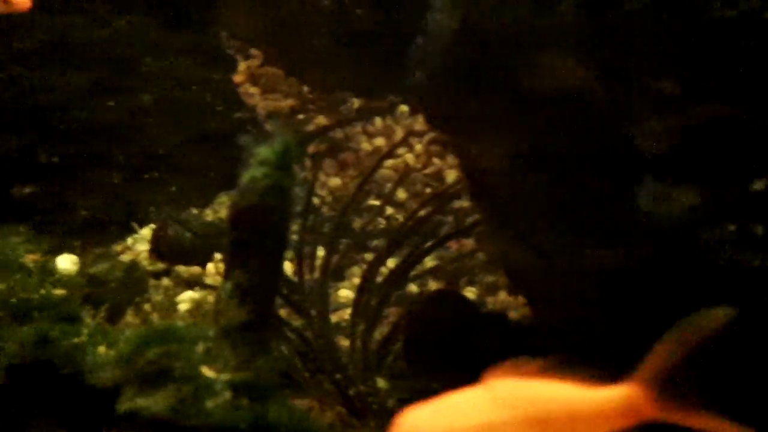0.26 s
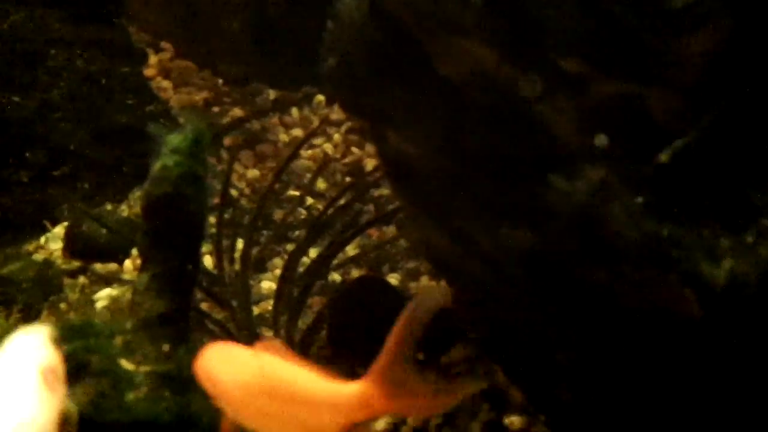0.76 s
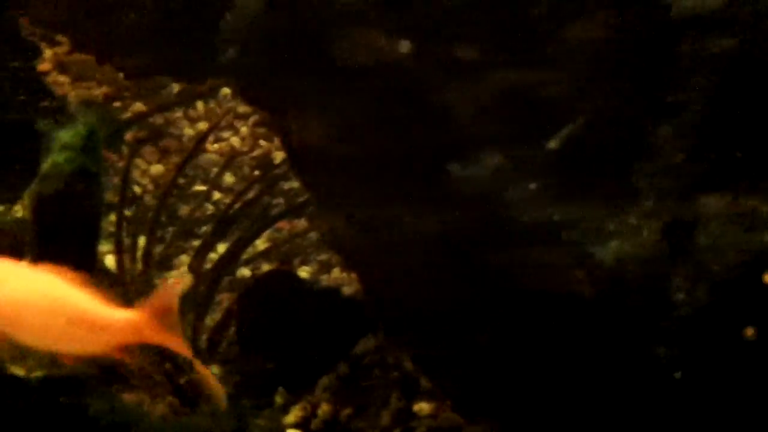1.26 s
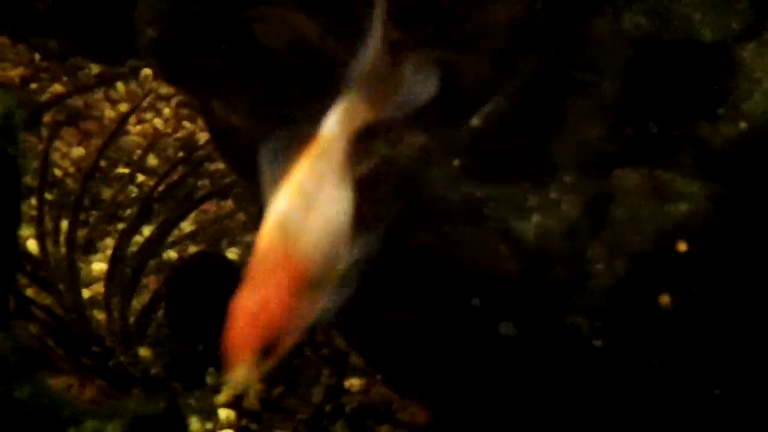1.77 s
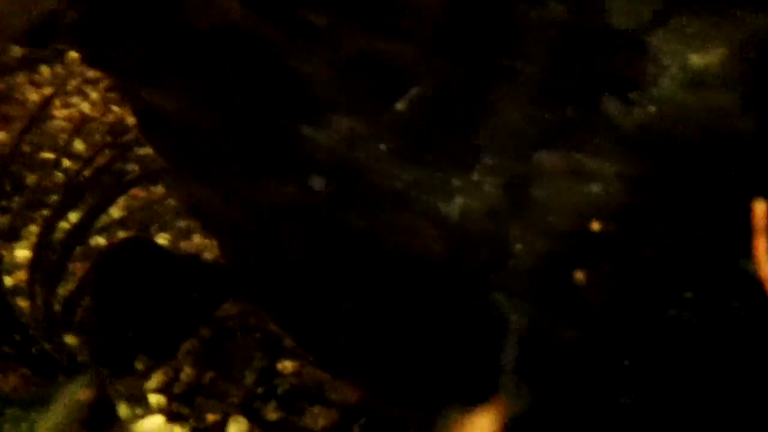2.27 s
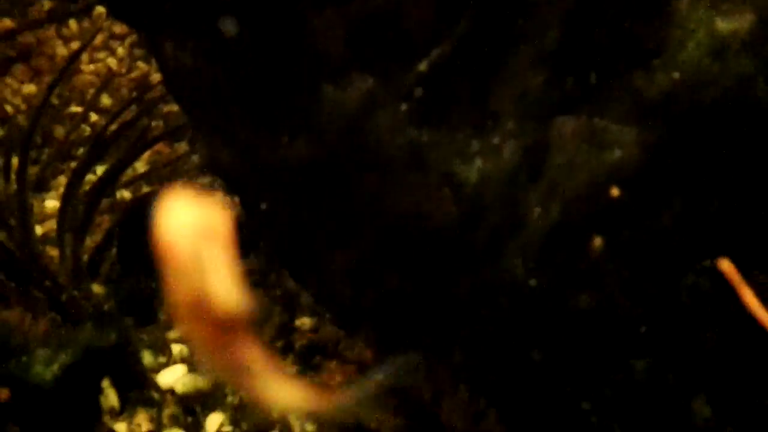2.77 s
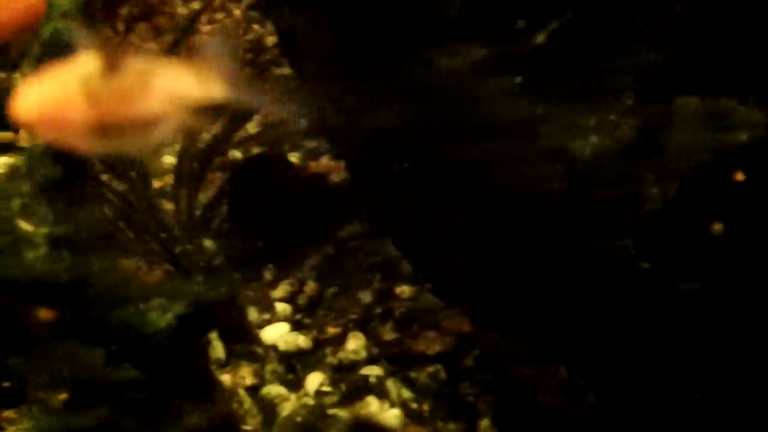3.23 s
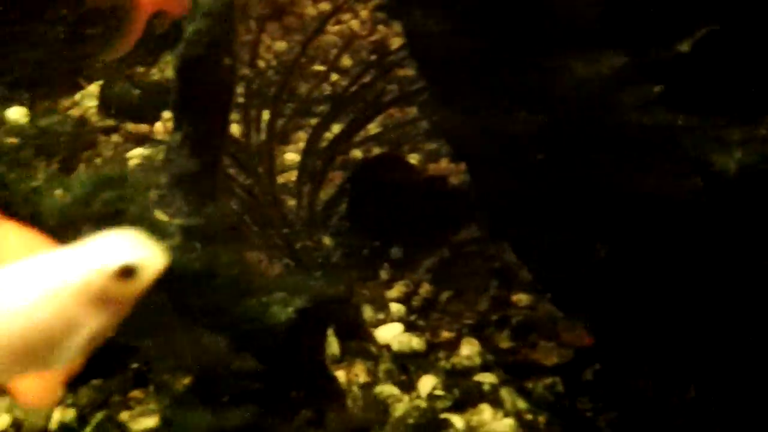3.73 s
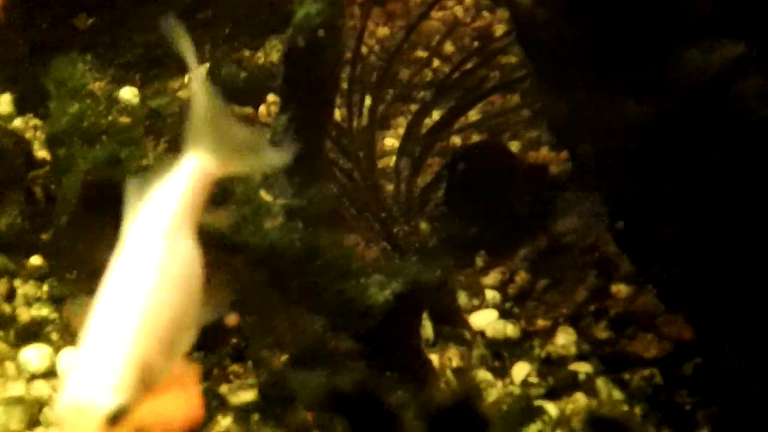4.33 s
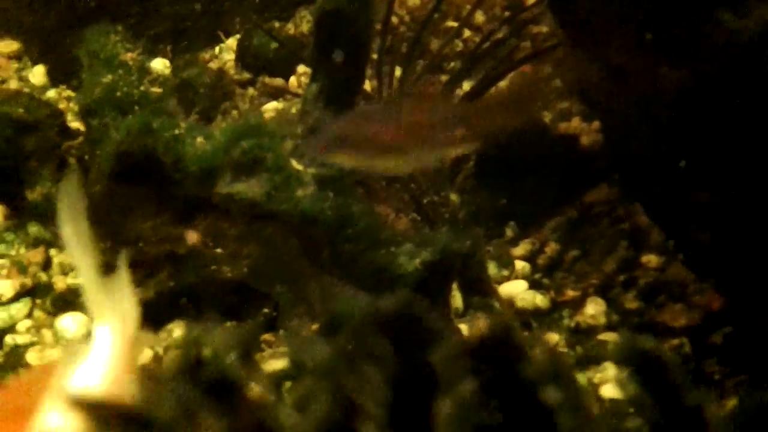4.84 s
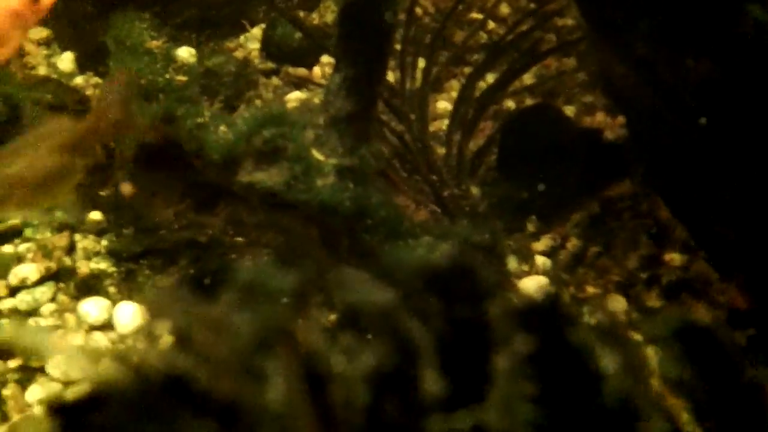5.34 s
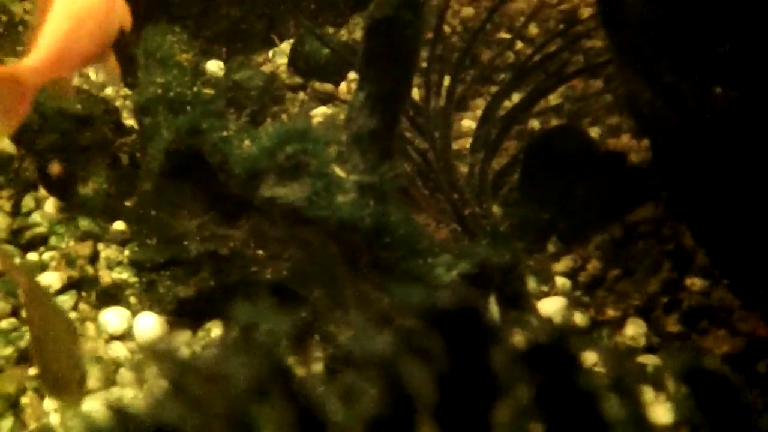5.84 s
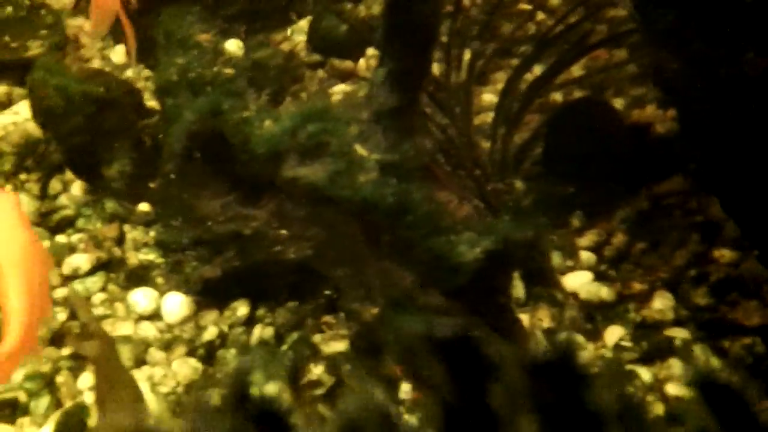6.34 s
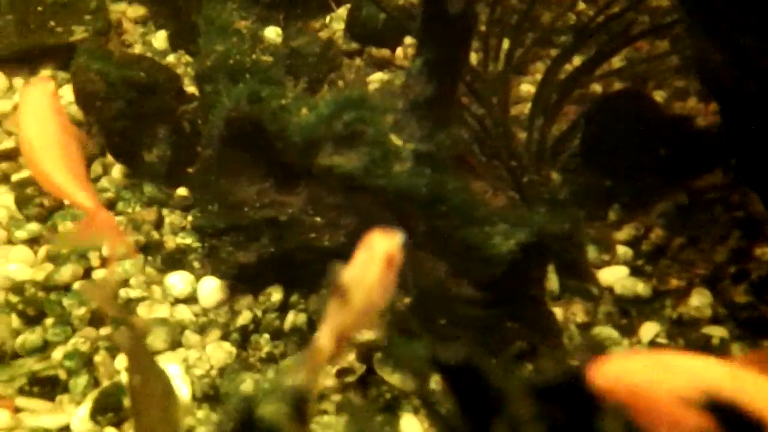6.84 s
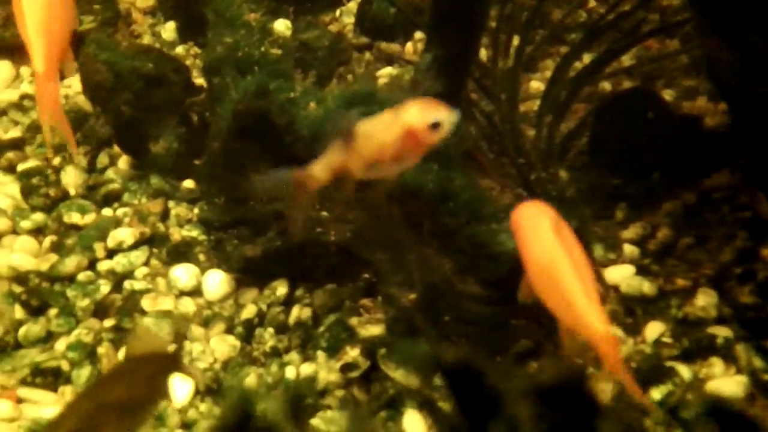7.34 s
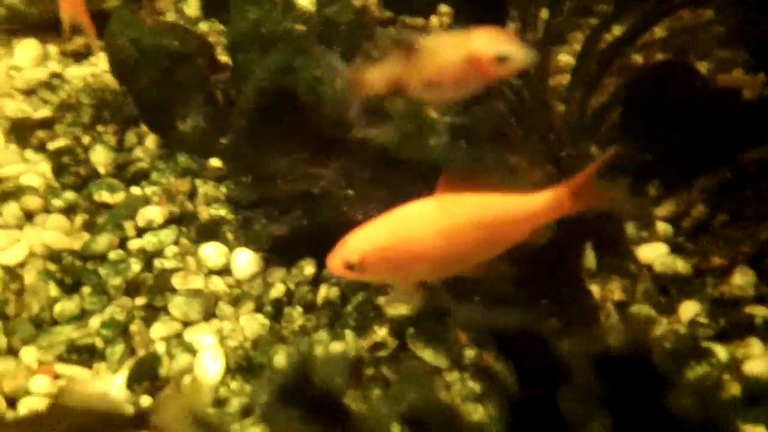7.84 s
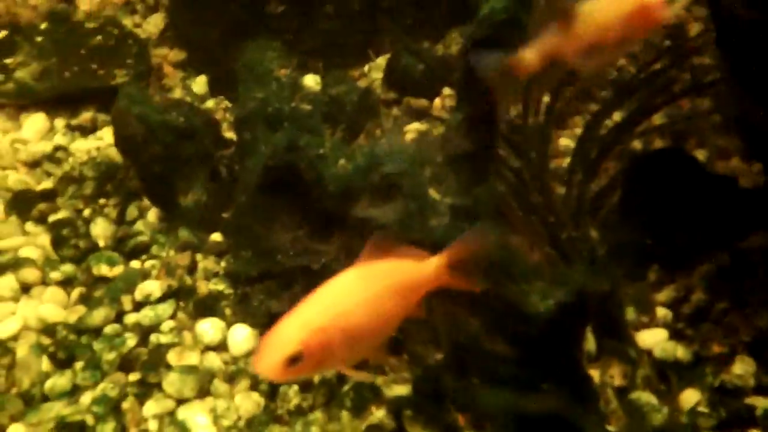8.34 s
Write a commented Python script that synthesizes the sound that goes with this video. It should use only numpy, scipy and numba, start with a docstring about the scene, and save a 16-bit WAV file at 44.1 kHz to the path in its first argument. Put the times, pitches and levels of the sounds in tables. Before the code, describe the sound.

Low electrical hum and churning water from a fish tank, with handling rumble and a run of loud microphone bumps in the second half.

```python
"""From the start an aquarium pump hums on the mains and its water rushes through the tank's hollow
resonances; a hand-held camera close by rumbles and rocks in the hand, over faint hiss.
From 5 s, knocks on the camera body overload the microphone. After each hard one the stepped gain
control shuts the hum out for a moment, then ticks back up. A last light knock and thump come at 8.1 s."""
import sys
import numpy as np
from scipy import signal
from scipy.fft import rfft, irfft, next_fast_len
from scipy.io import wavfile
from scipy.ndimage import minimum_filter1d
from numba import njit

SR = 44100
rng = np.random.default_rng(int(sys.argv[2]) if len(sys.argv) > 2 else 0)


def generate_wav(signal):
    """Clip the signal to [-1, 1] and save it as 16-bit WAV at the path in sys.argv[1]."""
    frames = np.transpose(np.atleast_2d(signal))
    scaled = np.clip(frames, -1, 1) * 32767
    pcm = np.round(scaled).astype(np.int16)
    wavfile.write(sys.argv[1], SR, pcm)


N = 379260
TIME_S = np.arange(N) / SR

# Knocks on the camera, before gain control: (time [s], peak [dB], contact [ms], sway peak [dB])
CAMERA_KNOCKS = [(4.9546, 25.5, 0.72, -3.5), (5.5384, 4.5, 0.46, -15.5), (5.7452, 25, 0.53, -8),
                 (5.9841, 19, 0.72, -0.5), (6.3052, 24, .53, 3.5), (6.4044, 8, 1.6, -13),
                 (6.4861, 4, 1.4, -3.5), (6.7001, 26, .58, -1), (6.9037, 17, .61, -4.5),
                 (6.9736, 11.5, 2.06, -12.5), (7.1545, 18, 0.5, -1), (7.2592, 10, 1.54, -3),
                 (8.1136, 1, 0.19, 8.5)]


def pump(mains_hz=49.905):
    """The magnet pulls twice per mains cycle, so even multiples lead."""
    # Hum partials: (mains multiple, rms [dB])
    partials = [(1, -44.5), (2, -22.5), (3, -34), (4, -39.5), (5, -35.5), (6, -35.5), (8, -35), (9, -38.5),
                (10, -32.5), (11, -60.5), (14, -63.5)]
    return sum(tone(round(k) * mains_hz, db) for k, db in partials)


def water(low_offset_db=0.33, low_follow=0.17):
    """One uneven flow stirs the tank's high resonances and, less keenly, its low ones."""
    # Hollow tank resonances: (centre [Hz], width [Hz], base density [dB])
    tank_modes = [(64.7, 36, -47.5), (148.9, 18, -47.5), (194, 36, -49), (252.4, 28, -48.5), (292, 36, -44),
                  (384.5, 62, -51), (442.2, 54, -46.5), (493.4, 56, -49), (561.3, 63, -60)]
    # Moving-water resonances: (centre [Hz], width [Hz], base density [dB])
    water_modes = [(661, 98, -69), (796, 93, -68), (944, 55, -75), (1154, 260, -85), (3260, 100, -99)]
    # Flow strength: (time [s], gain [dB])
    flow = [(0, 3.5), (.3, 5.5), (.8, 2), (2.5, -1.5), (3.3, 5.5), (4.3, 5.5), (5.4, 7), (6.5, -2),
            (7.5, 5.5), (8.6, 3)]
    flow_db = np.interp(TIME_S, *np.transpose(flow))
    low = amp(low_offset_db + low_follow * flow_db) * turbulence(tank_modes)
    high = amp(flow_db) * turbulence(water_modes)
    return low * surge(depth_db=1.3, rate_hz=20) + high * surge(depth_db=1.07, rate_hz=23)


def knocks(recoil_db=-19, recoil_lead=0.6, scatter_db=-36, scatter_t60_s=0.069):
    """The shell recoils, then the contact rings the body; scattered reflections prolong the ring."""
    # Camera body modes: (frequency [Hz], relative level [dB], t60 [s])
    body_modes = [(85, -21, 0.0093), (156, -3.5, 0.059), (283, -14, 0.11), (383, -6, 0.039),
                  (428.2, -4, 0.062), (427, -9, 0.058), (499, -10, 0.053), (800, -20, 0.021),
                  (1200, -11.5, 0.0052), (1580, -18, 0.021)]
    out, t = np.zeros(N), TIME_S[:SR // 5]
    ring = sum(amp(db) * decay(t, t60_s) * np.sin(2 * np.pi * hz * t) for hz, db, t60_s in body_modes)
    for s, db, contact_ms, _ in CAMERA_KNOCKS:
        paths = amp(scatter_db) * rng.standard_normal(len(t)) * decay(t, scatter_t60_s) * (t > 0.005)
        paths[0] = 1  # direct path
        force = push(contact_ms)
        blow = signal.fftconvolve(np.convolve(ring, force), paths)
        add(out, s, amp(db) * blow / abs(blow).max())
        add(out, s - recoil_lead * contact_ms / 1000, -amp(db + recoil_db) * force)
    return out


def hollow_ring(rms_re_knock_db=-13.5, swell_s=0.0063):
    """A diffuse hollow ring answers each knock, builds in milliseconds and dies quickly."""
    # Hollow resonances: (centre [Hz], width [Hz], relative density [dB])
    hollow_modes = [(146.6, 33, -6.5), (383, 58, -2), (512.4, 31, 1.5)]
    envelope, t = np.zeros(N), TIME_S[:SR // 5]
    for s, db, _, _ in CAMERA_KNOCKS:
        add(envelope, s, amp(db + rms_re_knock_db) * swelling(t, swell_s))
    ring = turbulence(hollow_modes)
    return envelope * ring / ring.std()


def hand(rest_rms_db=-21.5, rumble_re_sway_db=-12):
    """The hand rumbles steadily; each shift, thump and knock rocks the camera and adds rumble."""
    # Camera shifts in the hand: (time [s], peak [dB], swell [s])
    shifts = [(0.347, -8, 0.04), (1.056, -8.5, 0.024), (1.2, -10, 0.014), (1.397, -8, 0.038),
              (1.489, -6.5, 0.046), (2.393, -5, 0.03), (4.498, -8, 0.052), (5.388, -18.5, 0.04),
              (6.142, -2, 0.034), (7.072, -2.5, 0.015)]
    # Soft palm thumps: (time [s], peak [dB])
    thumps = [(6.485, 9.5), (7.985, -8), (8.107, -1.5)]
    # Hand rumble: (frequency [Hz], relative density [dB])
    rumble_spectrum = [(2, -33), (8, -5.5), (15, -8), (22, -8), (28, -11), (42, -18.5), (70, -21),
                       (120, -30.5), (300, -55), (1000, -100)]
    shift_hz, thump_hz, knock_hz = 18, 58.2, 11
    thump_swell_s, knock_swell_s = 0.005, 0.05
    rocks = [(s, db, shift_hz, swell_s) for s, db, swell_s in shifts]
    rocks += [(s, db, thump_hz, thump_swell_s) for s, db in thumps]
    rocks += [(s, db, knock_hz, knock_swell_s) for s, _, _, db in CAMERA_KNOCKS]
    sway, unrest, t = np.zeros(N), np.zeros(N), TIME_S[:SR]
    for s, db, hz, swell_s in rocks:
        envelope = amp(db) * swelling(t, swell_s)
        add(sway, s, envelope * np.sin(2 * np.pi * hz * t))
        add(unrest, s, envelope)
    rumble = noise(lambda hz: spectrum_gain(rumble_spectrum, hz))
    rumble_rms = np.hypot(amp(rest_rms_db), amp(rumble_re_sway_db) * unrest)
    return sway + rumble_rms * rumble / rumble.std()


def hiss():
    """Electronic noise ahead of the gain control."""
    # Noise floor: (frequency [Hz], density [dB])
    hiss_spectrum = [(100, -75.5), (1000, -85.5), (1500, -86.5), (2000, -89), (2600, -93.5), (3300, -93.5),
                     (3800, -96.5), (5000, -99), (7000, -102), (10000, -103), (14200, -102), (15600, -118)]
    return noise(lambda hz: spectrum_gain(hiss_spectrum, hz))


def amp(db):
    return 10 ** (np.asarray(db) / 20)


def spectrum_gain(points, hz):
    """Gain from (Hz, dB) points joined on a log-frequency axis."""
    point_hz, db = np.transpose(points)
    return amp(np.interp(np.log(hz + 1), np.log(point_hz + 1), db))


def add(mix, start_s, sound):
    part = mix[round(start_s * SR):][:len(sound)]
    part += sound[:len(part)]


def tone(hz, rms_db):
    return np.sqrt(2) * amp(rms_db) * np.sin(2 * np.pi * (hz * TIME_S + rng.random()))


def noise(density):
    """Noise of amplitude density(hz) per root Hz."""
    size = next_fast_len(N)
    hz = np.fft.rfftfreq(size, 1 / SR)
    white = rfft(rng.standard_normal(size))
    return irfft(white * density(hz), size)[:N] * np.sqrt(SR / 2)


def turbulence(modes):
    """Noise through steep-sided resonances."""
    def density(hz):
        powers = (amp(db) ** 2 / (1 + ((hz - centre_hz) / width_hz) ** 2) ** 4
                  for centre_hz, width_hz, db in modes)
        return np.sqrt(sum(powers))
    return noise(density)


def surge(depth_db, rate_hz):
    """Random swell around gain 1."""
    knots_s = np.arange(0, N / SR + 1, 1 / rate_hz)
    return amp(depth_db * np.interp(TIME_S, knots_s, rng.standard_normal(len(knots_s))))


def push(contact_ms):
    """Smooth force pulse of height 1."""
    progress = np.arange(0, 1, 1000 / (contact_ms * SR))
    return np.sin(np.pi * progress) ** 2


def decay(t, t60_s):
    return np.exp(-np.log(1000) * t / t60_s)


def swelling(t, swell_s):
    """Rises to 1 at swell_s, then dies away."""
    return t / swell_s * np.exp(1 - t / swell_s)


@njit
def stepped_gain_db(peak_db):
    """Gain plunges on overload, steps down while too loud and ticks back up more slowly."""
    target_db, overload_db = -8, -2.5
    step_db, plunge_db_per_sample = 0.8355, 0.5
    fall_samples, rise_samples = 58, 234
    out, gain_db = np.zeros(len(peak_db)), 0.
    for i in range(len(peak_db)):
        level_db = peak_db[i] + gain_db
        if level_db > overload_db:
            gain_db -= plunge_db_per_sample
        elif level_db > target_db and i % fall_samples == 0:
            gain_db -= step_db
        elif level_db < target_db - step_db and i % rise_samples == 0:
            gain_db = min(gain_db + step_db, 0.)
        out[i] = gain_db
    return out


def scene():
    """Mono sum ahead of the gain control."""
    return (pump() + water() + hiss() + hand() + knocks() + hollow_ring())[None]


def record(dry, hold_s=0.046, cutoff_hz=15500):
    """Gain control on the held peak, hard clip, colour, band limit."""
    # Camera response, notched in the treble: (frequency [Hz], gain [dB])
    response = [(20, -0.5), (6500, -0.5), (7500, -7.5), (8000, -13), (8400, -7.5), (9500, -1.5),
                (15000, -2.5)]
    hold_samples = 2 * int(hold_s * SR / 2) + 1
    held_peak = -minimum_filter1d(-abs(dry[0]), hold_samples, origin=hold_samples // 2)
    gain_db = stepped_gain_db(20 * np.log10(held_peak + 1e-9))
    clipped = np.clip(dry * amp(gain_db), -1, 1)
    hz = np.linspace(0, SR / 2, 513)
    colour = signal.firwin2(255, hz, spectrum_gain(response, hz), fs=SR)
    lowpass = signal.firwin(511, cutoff_hz, window=("kaiser", 9), fs=SR)
    return signal.oaconvolve(clipped, np.convolve(colour, lowpass)[None], "same")


dry = scene()
out = record(dry)
generate_wav(out)
```